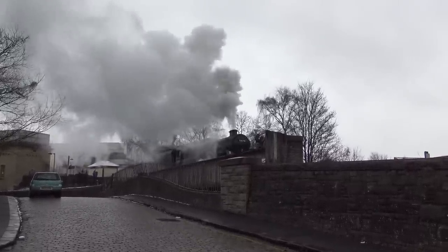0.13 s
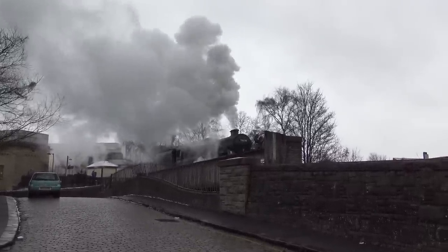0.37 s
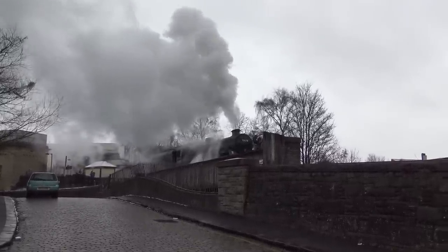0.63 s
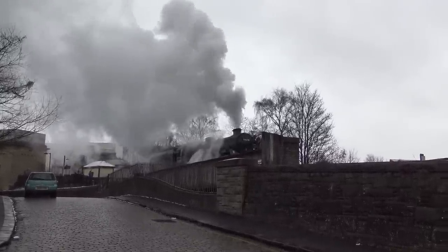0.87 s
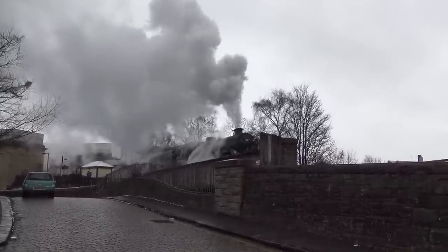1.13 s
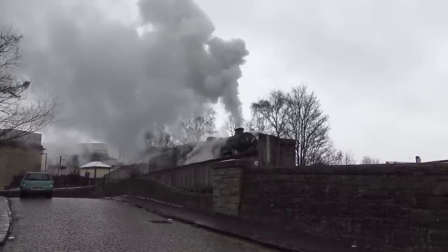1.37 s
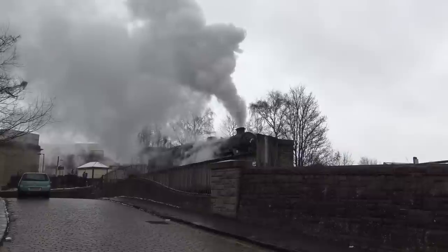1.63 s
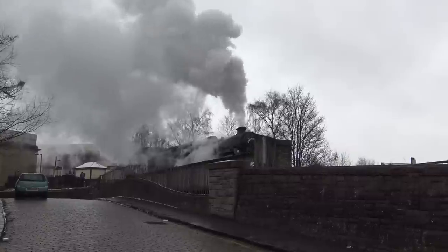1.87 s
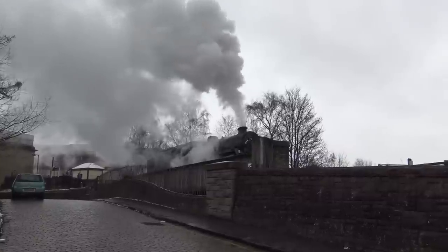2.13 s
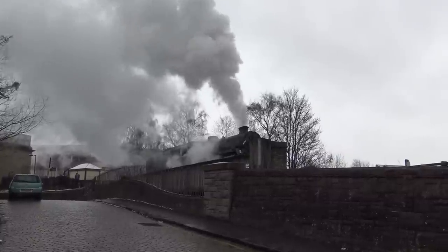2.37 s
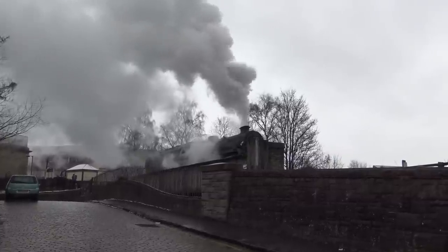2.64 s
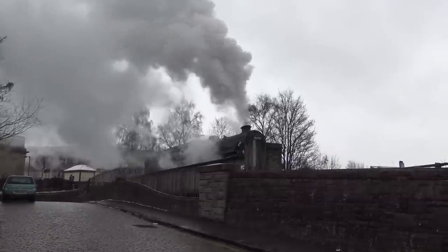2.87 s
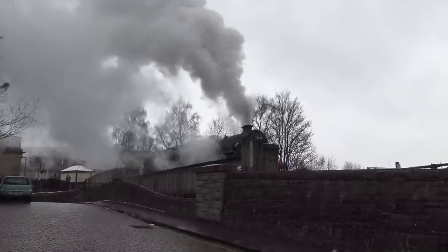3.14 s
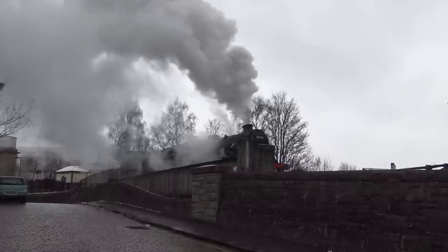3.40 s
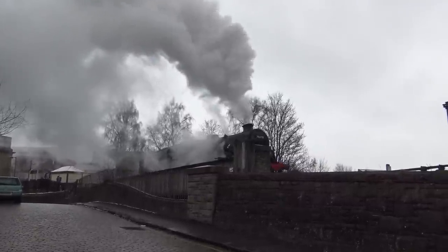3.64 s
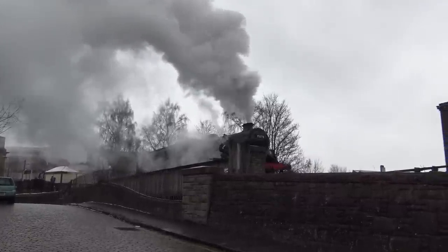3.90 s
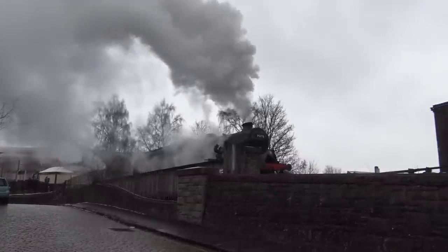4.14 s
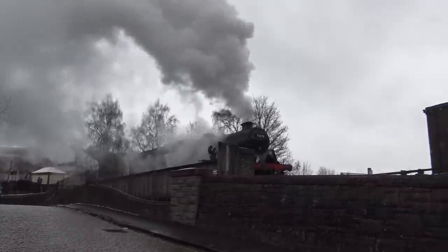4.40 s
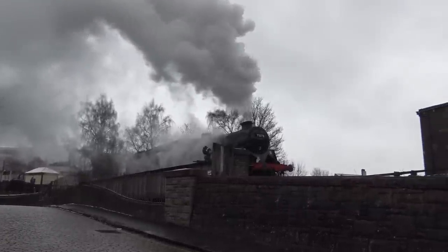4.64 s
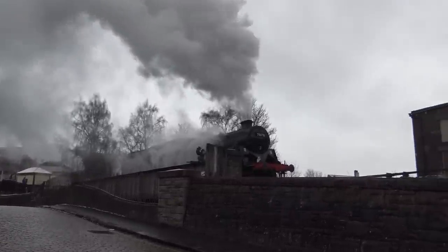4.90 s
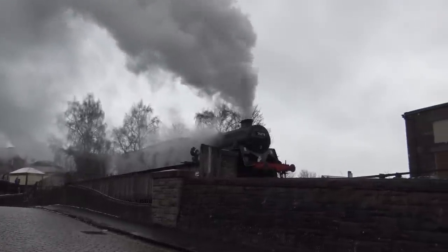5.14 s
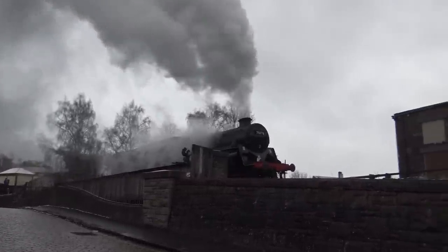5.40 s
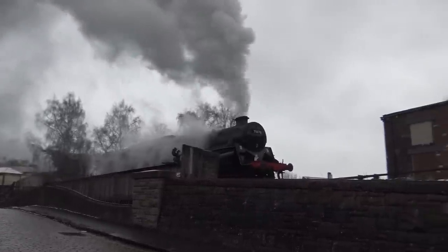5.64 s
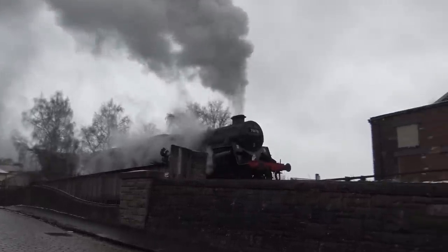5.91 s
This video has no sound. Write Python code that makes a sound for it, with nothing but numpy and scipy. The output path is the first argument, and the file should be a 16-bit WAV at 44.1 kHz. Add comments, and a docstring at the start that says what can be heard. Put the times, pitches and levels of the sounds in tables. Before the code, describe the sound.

A steam locomotive sets off outdoors with nine hoarse, hooting exhaust chuffs that slowly quicken and strengthen, over leaking hiss and growing low rumble.

```python
"""A steam locomotive sets off up a walled ramp beside a cobbled street, with a faint town noise all along.
It opens on a blast of steam; eight more follow, closer and closer together. Each is noise that roars up
the chimney, booms in the smokebox and blows a wavering tone, the hoot. Once every four beats a leaking
gland swells and fades as filtered hiss, mostly stronger towards the end. Low noise makes the train's
rumble, strongest in the last second; delayed copies and a noise tail make the echoes throughout."""
import sys
import numpy as np
from scipy import signal
from scipy.fft import rfft, irfft, next_fast_len
from scipy.io import wavfile
from scipy.ndimage import uniform_filter1d

SR = 44100
rng = np.random.default_rng(int(sys.argv[2]) if len(sys.argv) > 2 else 0)


def rack_gain(trim_db):
    """Turn a fader trim in dB into the linear factor to multiply a signal by."""
    fader = np.asarray(trim_db, float)
    return 10 ** (fader / 20)


def unload_audio(sound):
    """Save the sound as a 16-bit wav file, at the path given as the first command line argument."""
    columns = np.transpose(np.atleast_2d(sound))
    # keep every value between -1 and 1, then stretch to whole-number steps
    steps = np.round(np.clip(columns, -1, 1) * 32767)
    wavfile.write(sys.argv[1], SR, steps.astype(np.int16))


N = 265482
TIME = np.arange(N) / SR  # seconds

# Tone of the town noise. Each row: frequency in Hz, relative strength in dB.
TOWN_TONE = [(120, -46), (170, 10.5), (230, 10), (310, -0.5), (410, 2.5), (600, 1), (1200, -2), (2400, -7),
             (4700, -16), (8000, -25), (15500, -22)]
TOWN_DB = -38.5  # middle level, before slow swells

# Loudness of the train's rumble. Each row: time in seconds, level between thrusts in dB.
RUMBLE_LEVEL = [(0, -36.5), (.6, -38.5), (1.5, -35.5), (2.5, -36.5), (3.6, -36), (4.8, -35), (5.4, -31),
                (6.02, -32.5)]
# Tone of the rumble. Each row: frequency in Hz, relative strength in dB.
RUMBLE_TONE = [(18, -46), (30, 9), (50, 0.5), (95, 5.5), (130, 2), (170, -9), (300, -36)]
# Every beat shakes the frames a little: a bump in the rumble.
THRUST_DB, THRUST_LATE_S, THRUST_S = 5, 0.044, 0.071

# Echo off the cobbles; its detour grows as the engine nears.
# Each row: time in seconds, first cancelled pitch in Hz.
COBBLE_ECHO = [(0, 707), (2.6, 660), (6.02, 540)]
STREET_T60_S, STREET_DB = 1.54, -35.5  # time for the far echo's decay to fall 60 dB, and its level

# Steam past the gland through one wheel turn of four beats.
# Each row: beats since the turn began, relative level in dB, tilt in dB per octave.
LEAK_TURN = [(0, -40, 14), (.08, -7, -5), (.17, -10.5, -4.5), (.23, -4, 1.3), (.36, -0.7, .6),
             (1.35, 0.7, 0.16), (1.95, -2, -1.5), (2.2, -6.5, -2), (2.75, -10.5, -2.5), (3.05, -11.5, -7),
             (3.3, -26, -8.5), (3.99, -26, -7)]
# Strength of the open leak. Each row: time in seconds, level in dB, added tilt in dB per octave.
LEAK_LEVEL = [(0, -30.5, -1.2), (.5, -32, -0.1), (1.1, -32, 0.2), (1.6, -32, 0.5), (2.0, -31.5, 1.1),
              (2.9, -27, 0), (3.6, -29, 0.25), (4.3, -29.5, 0.6), (4.7, -25, 0.5), (5.1, -27, 0.5),
              (5.45, -24.5, 1.3), (5.7, -23.5, 0), (6.02, -20, 1)]
# Tone of the leaking steam before tilting. Each row: frequency in Hz, relative strength in dB.
STEAM_TONE = [(300, -8.5), (1000, 0.5), (1850, 1), (3500, 1.5), (6000, -1), (9000, -5), (15500, -6.5)]
FIRST_BEAT = 1  # place of the first beat in its wheel turn, counted from 0

# Exhaust beats. Each row: middle of the blast in seconds, port opening time in seconds,
# full-blast hold in seconds, then the blast, smokebox boom and chimney hoot settings in dB.
BEATS = [(0.042, .1, 0.075, -17.5, -16, -16), (0.943, 0.081, 0.055, -21.5, -16.5, -27),
         (1.777, 0.098, 0.058, -19.5, -13.5, -23.5), (2.56, 0.099, 0.035, -14, -9, -13.5),
         (3.269, 0.095, 0.034, -14.5, -10, -14.5), (3.92, 0.07, 0.034, -18, -13, -12.5),
         (4.57, 0.071, 0.047, -17.5, -9.5, -16), (5.193, 0.088, 0.018, -12.5, -5.5, -13.5),
         (5.769, 0.075, 0.024, -12.5, -6.5, -8.5)]
# Colour of each beat. Each row: treble edge in dB, bark pitch in Hz,
# width in Hz of each of the bark's two filters, bark level in dB.
BEAT_COLOURS = [(-7, 940, 420, -1), (-2, 1020, 550, -2), (4, 857, 110, -4.5), (-2, 815, 137, -6.5),
                (-1, 806, 120, -4.5), (-14.5, 1183, 42, -11), (-16, 700, 122, -7), (-0.5, 1120, 150, -9.5),
                (-3, 1035, 170, -9.5)]
# Where each blast's slow tail sets in. One number per beat: dB relative to full blast.
BLAST_TAILS = [-8, -8, -9.5, -7, -4, -5, -7, -7, -8]
# Hoot of each beat. Each row: pitch at mid-blast in Hz, lateness in seconds, fading in dB per second,
# time after mid-blast when it starts to die out in seconds, least roughness from 0 to 1.
HOOTS = [(216.1, 0.038, 98, 0.13, 0.72), (229, 0.019, 40, 0.151, .7), (235, 0.021, 110.5, 0.14, 0.71),
         (231.6, 0.036, 54, 0.17, 0.14), (235.3, 0.023, 101, 0.18, 0.29), (236, 0.003, 110, .19, 0.65),
         (231.3, 0.0055, 114, 0.185, 0.59), (229.7, 0.0056, 105.5, 0.2, 0.63),
         (236, 0.0033, 134, 0.16, 0.77)]
# Resonances of the smokebox. Each row: frequency in Hz, width in Hz, relative strength in dB.
SMOKEBOX_MODES = [(301.5, 39, -3.5), (397, 39.2, 1.5), (506, 112, -4)]
# Upper resonances of the chimney. Each row: frequency in Hz, width in Hz, relative strength in dB.
CHIMNEY_MODES = [(620, 117, 1.5), (913, 25, -5), (1046, 20, 4), (1208, 78, -1), (1393, 110, -2),
                 (2065, 57, -4), (2785, 124, -13.5)]
# Tone of the steam jet before its treble is set. Each row: frequency in Hz, relative strength in dB.
JET_TONE = [(30, -19), (120, -9.5), (600, 3.5), (1200, -5.5), (2400, -9.5), (4700, -16), (8000, -36),
            (15500, -37)]
# Pressure grows as a power of time; OPEN_S is the hoot's build-up time and the boom's longest.
OPEN_S, OPEN_POWER = 0.1016, 1.94
FIRST_POWER, CREST_DB_S = 0.89, 120  # abrupt first steam; treble loss either side of mid-blast
BLAST_FALL_DB_S, BLAST_TAIL_DB_S = 200, 96  # quick ebb, then what is left in the cylinder
BOOM_LATE_S, BOOM_POWER = 0.0022, 2.4
BOOM_FALL_DB_S, BOOM_TAIL_DB, BOOM_TAIL_DB_S = 209, -11, 92
HOOT_POWER, HOOT_SAG_HZ_S, HOOT_END_DB_S = 2.87, 55.92, 600
SHUT_DB = -70  # lowest level setting while the blast pipe is shut

# Colour of the microphone capsule. Each row: frequency in Hz, gain in dB.
CAPSULE_TONE = [(20, 3), (6500, -2.5), (8300, -0.5), (10200, -9), (11500, -9.5), (13300, -7.5),
                (15500, -14)]


def noise():
    """White noise holds every pitch in equal strength."""
    return rng.standard_normal(N)


def unit(x):
    """Scale a sound to an average (rms) strength of 1."""
    return x / np.sqrt(np.mean(x ** 2))


def colour(x, points):
    """Filter by (Hz, dB) points joined on an axis of log frequency."""
    hz, db = np.transpose(points)
    size = next_fast_len(N)
    log_hz = np.log(np.fft.rfftfreq(size, 1 / SR) + 1)
    gain = rack_gain(np.interp(log_hz, np.log(hz), db))
    return irfft(rfft(x, size) * gain, size)[:N]


def split(x, hz):
    """The parts of a sound below and above a frequency."""
    low = signal.sosfiltfilt(signal.butter(3, hz, fs=SR, output="sos"), x)
    return low, x - low


def ring(x, modes):
    """A hollow body rings at several resonances, neighbours in opposite phase."""
    out = 0
    for k, (hz, width, db) in enumerate(modes):
        b, a = signal.iirpeak(hz, hz / width, SR)
        out = out + (-1) ** k * rack_gain(db) * signal.lfilter(b, a, x)
    return out


def walk(rate):
    """Random wandering with a spread near 1: levels held for 1 / rate seconds, smoothed twice."""
    k = int(SR / rate)
    held = rng.standard_normal(N // 200)[np.arange(N) // k]
    return 1.65 * uniform_filter1d(uniform_filter1d(held, k), k)


def curve(points, at=TIME):
    """Columns of a table, joined by straight lines along its first column."""
    place, *columns = np.transpose(points)
    return [np.interp(at, place, column) for column in columns]


def delayed(x, lag):
    """A sound arriving late by a changing number of samples."""
    return np.interp(np.arange(N) - lag, np.arange(N), x)


def town():
    """Steady coloured noise with slow swells."""
    return unit(colour(noise(), TOWN_TONE)) * rack_gain(TOWN_DB + 0.56 * walk(3.44))


def street(x):
    """Far houses and sheds return a dull, diffuse tail that builds up late."""
    t = TIME[:2 * SR]
    build_up = np.clip(t / .3, 0, 1) ** 2
    dull = split(rng.standard_normal(len(t)), 1680)[0]
    tail = dull * rack_gain(-60 * t / STREET_T60_S) * build_up
    return signal.fftconvolve(x, tail / np.sqrt(np.sum(tail ** 2)))[:N] * rack_gain(STREET_DB)


def ground(x, share):
    """A path off the cobbles cancels the pitch whose half wave fits it; rough stones scatter the treble."""
    lag = SR / (2 * curve(COBBLE_ECHO)[0])
    return x + share * delayed(split(x, 820)[0], lag)


def wall(x):
    """A short slap off the parapet; its path lengthens as the engine moves and wavers in warm steam."""
    lag = SR * (0.0032 + 0.000304 * TIME + .00003 * walk(5.4))
    return x + 0.098 * delayed(x, lag)


def train():
    """Wheels and carriages: a low rumble that comes in lumps."""
    thrust = sum(np.exp(-((TIME - s - THRUST_LATE_S) / THRUST_S) ** 2) for s, *_ in BEATS)
    level_db = curve(RUMBLE_LEVEL)[0] + THRUST_DB * thrust + walk(9)
    return unit(colour(noise(), RUMBLE_TONE)) * rack_gain(level_db)


def wheel_beats():
    """Beats since the wheel turn began, 0 to 4."""
    s = np.transpose(BEATS)[0]
    s = np.append(s, 2 * s[-1] - s[-2])  # one more beat, equally spaced, keeps the wheel turning
    return (FIRST_BEAT + np.interp(TIME, s, np.arange(len(s)))) % 4


def leak():
    """Steam hiss whose half-octave bands drift apart; its tilt follows the wheel and the time."""
    open_db, turn_tilt = curve(LEAK_TURN, wheel_beats())
    level_db, added_tilt = curve(LEAK_LEVEL)
    tilt = turn_tilt + added_tilt
    rest = unit(colour(noise(), STEAM_TONE))
    swell = 0.17 * walk(4.79)
    hiss = 0
    for octave in np.arange(-3, 1.6, .5):  # octaves from 7000 Hz
        band, rest = split(rest, 7000 * 2 ** octave)
        hiss = hiss + band * rack_gain(tilt * octave + swell + 0.5 * walk(3.8))
    return hiss * rack_gain(open_db + level_db)


def opening(t, hold, rise, power):
    """Rise in dB while the port opens; 0 from the start of the hold."""
    return 20 * power * np.log10(np.clip(1 + (t + hold / 2) / rise, 1e-3, 1))


def ebb(t, hold, fall_db, tail_db, tail_fall_db):
    """Fall in dB after the hold: steep at first, then a slower tail."""
    late = np.maximum(t - hold / 2, 0)
    return np.maximum(-fall_db * late, tail_db - tail_fall_db * late)


def beat_controls():
    """Every beat opens, holds and ebbs by one law; between beats the blast pipe is shut."""
    s, rise, hold, blast_db, boom_db, hoot_db = np.transpose(BEATS)
    k = np.searchsorted((s[1:] + s[:-1]) / 2, TIME)  # the nearest beat
    t, rise, hold = TIME - s[k], rise[k], hold[k]
    hz, late, fade_db, ends, rough = np.array(HOOTS)[k].T

    blast = blast_db[k] + opening(t, hold, rise, OPEN_POWER)
    blast = blast + ebb(t, hold, BLAST_FALL_DB_S, np.array(BLAST_TAILS)[k], BLAST_TAIL_DB_S)
    # the first steam rises by its own, gentler power
    first = blast + np.where(t < 0, opening(t, hold, rise, FIRST_POWER - OPEN_POWER), 0)
    first = np.where(t + hold / 2 < -rise, SHUT_DB, first)
    sharp = np.array(BEAT_COLOURS)[k, 0] - CREST_DB_S * np.minimum(np.abs(t), hold / 2 + .02)

    slow = t - BOOM_LATE_S
    boom = boom_db[k] + opening(slow, hold, np.minimum(rise + 0.056, OPEN_S), BOOM_POWER)
    boom = boom + ebb(slow, hold, BOOM_FALL_DB_S, BOOM_TAIL_DB, BOOM_TAIL_DB_S)

    hoot = hoot_db[k] + opening(t - late, hold, OPEN_S, HOOT_POWER)
    hoot = hoot - fade_db * np.maximum(t - late, 0) - HOOT_END_DB_S * np.maximum(t - ends, 0)
    pitch = hz - HOOT_SAG_HZ_S * np.clip(t, -.1, .25)

    blast, first, boom, hoot = np.maximum([blast, first, boom, hoot], SHUT_DB)
    controls = np.array([blast, first, boom, pitch, hoot, rough, sharp])
    return uniform_filter1d(controls, size=300)  # soften corners over about 7 ms


def bark():
    """Each blast favours one upper chimney mode of its own."""
    out = np.zeros(N)
    for (s, *_), (_, hz, width, db) in zip(BEATS, BEAT_COLOURS):
        now = np.abs(TIME - s) < .27
        mode = [(hz, width, 0)]
        tone = unit(ring(ring(noise(), mode), mode))
        out[now] = tone[now] * rack_gain(db)
    return out


def chimney_hoot(boom_db, hoot_hz, hoot_db, rough):
    """The lowest chimney mode hoots; it breaks into breath under strong blast and steadies in the ebb."""
    shake = np.clip((boom_db + 33) / 18, np.clip(rough, 0, 1), 1)
    phase = 2 * np.pi * np.cumsum(hoot_hz + 14 * shake * walk(45)) / SR
    flutter_db = 3.8 * shake * walk(40) + 2.1 * walk(16)
    tone = np.sqrt(2) * rack_gain(flutter_db) * np.sin(phase)
    breath = split(unit(ring(noise(), [(234, 62, 0)])), 147)[1]
    return (tone + 0.73 * shake * breath) * rack_gain(hoot_db)


def exhaust():
    """Eddying jet noise excites chimney and smokebox, and the chimney's lowest mode hoots."""
    blast_db, first_db, boom_db, hoot_hz, hoot_db, rough, sharp_db = beat_controls()
    body, edge = split(unit(colour(noise(), JET_TONE)), 2900)
    thump, body = split(body, 286)
    # a faster jet is brighter: its edge grows more steeply than its body
    edge = edge * rack_gain(sharp_db + 0.22 * (blast_db + 9) + 0.74 * walk(150))
    jet = (body + edge) * rack_gain(blast_db - 0.65)
    # the first steam past the valve rings the chimney just ahead of the full jet
    chimney = rack_gain(-3.5) * unit(ring(noise(), CHIMNEY_MODES)) + bark()
    roar = (chimney * rack_gain(first_db) + jet) * rack_gain(1.2 * walk(110))
    # the smokebox passes little below its lowest mode
    boom = split(unit(ring(noise(), SMOKEBOX_MODES)), 252)[1] + rack_gain(-2) * thump
    boom = boom * rack_gain(boom_db + 1.07 * walk(70))
    return ground(roar + boom, 0.78) + chimney_hoot(boom_db, hoot_hz, hoot_db, rough)


def scene():
    """All sources and echoes add up at one capsule, giving two equal channels."""
    beats = exhaust()
    engine = wall(beats + ground(leak(), 0.07))
    return np.tile(engine + street(beats) + train() + town(), (2, 1))


def roll_off(x):
    """The treble ends steeply here."""
    return signal.sosfilt(signal.butter(12, 15640, fs=SR, output="sos"), x)


def record(dry):
    """The capsule colours the sound; a hard ceiling cuts off any peaks above full scale."""
    capsule = np.clip(colour(dry[0], CAPSULE_TONE), -1, 1)
    mix = np.tile(capsule, (2, 1))
    return roll_off(mix)


dry = scene()
out = record(dry)
unload_audio(out)
```